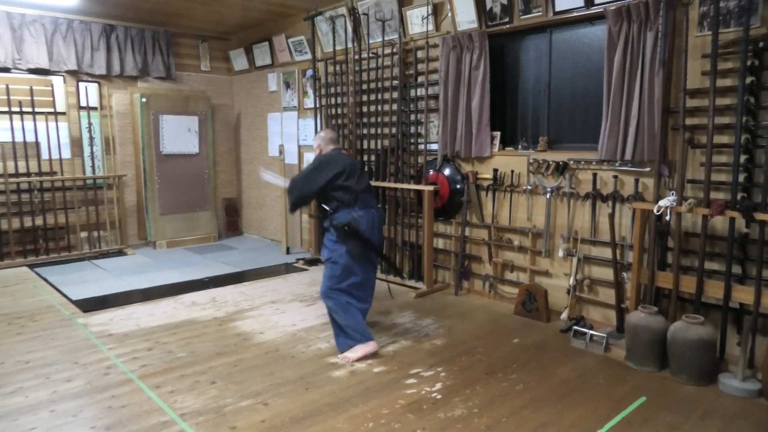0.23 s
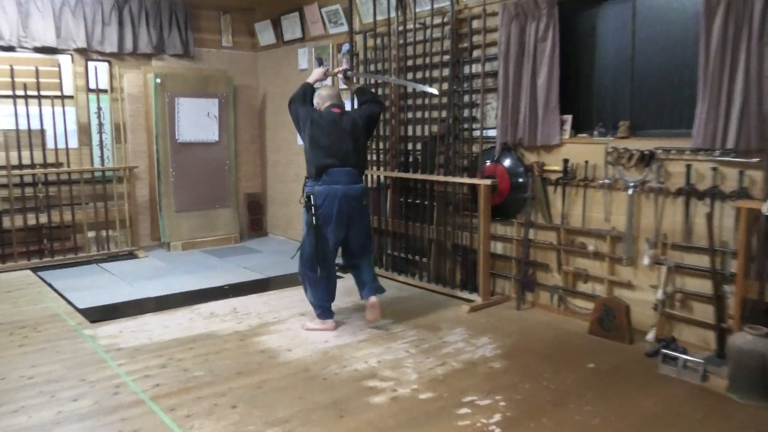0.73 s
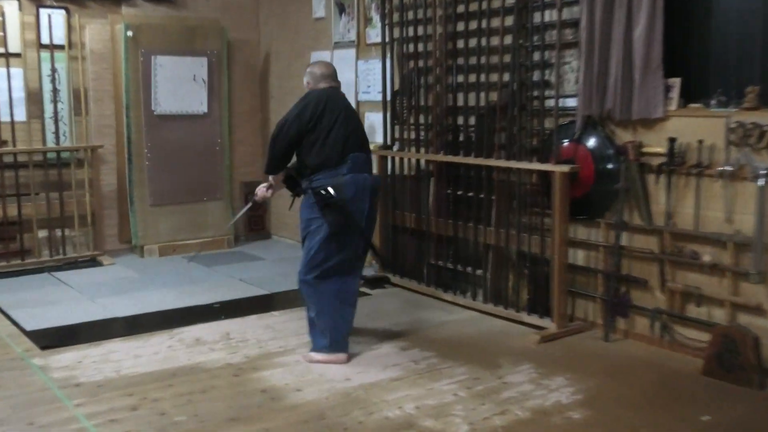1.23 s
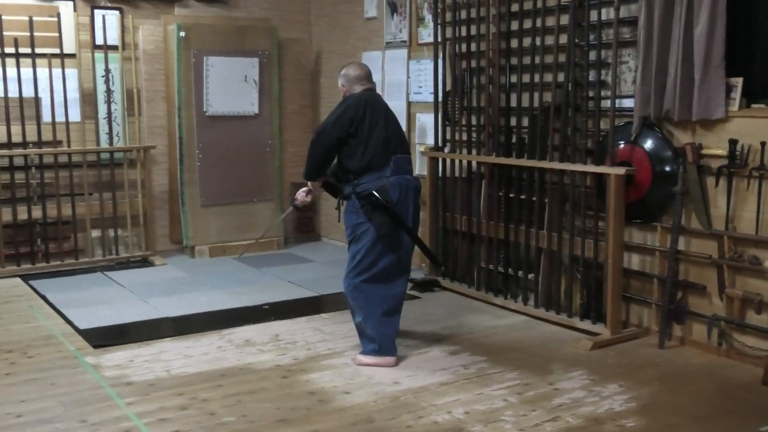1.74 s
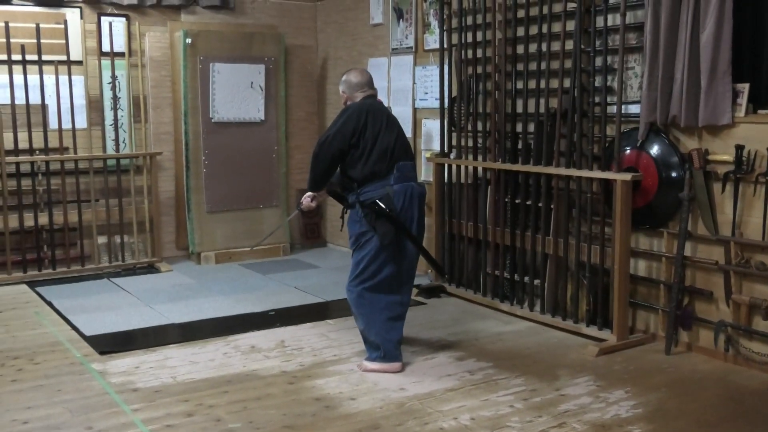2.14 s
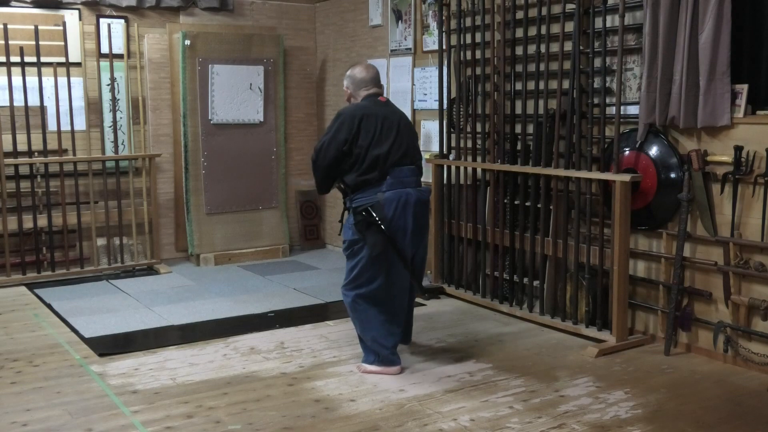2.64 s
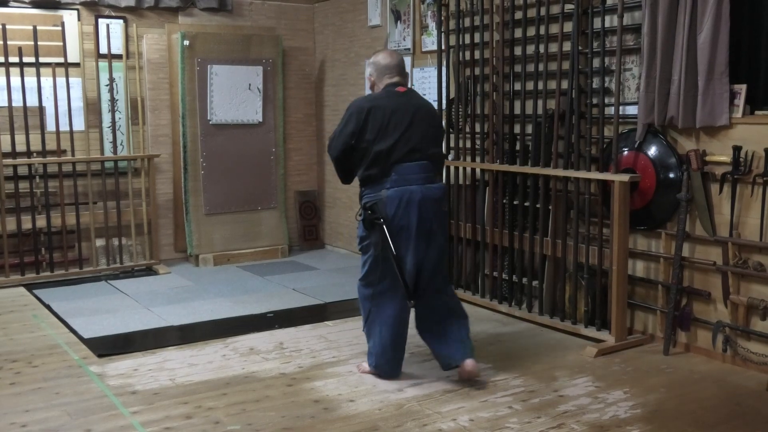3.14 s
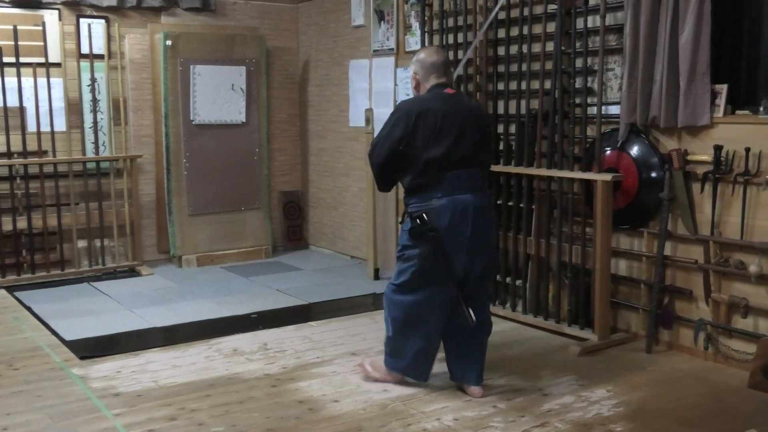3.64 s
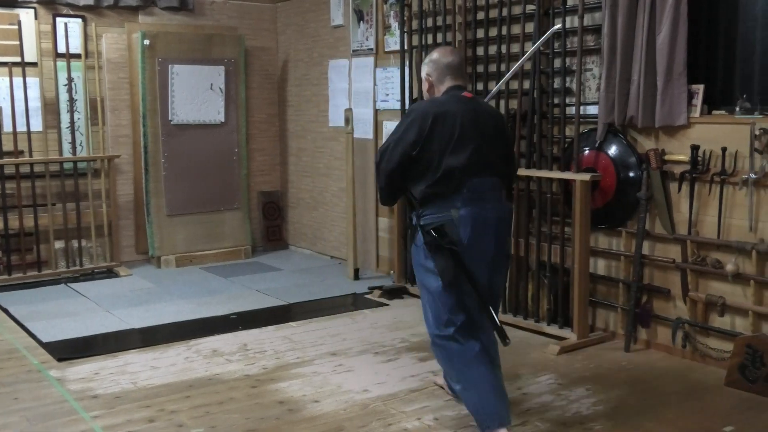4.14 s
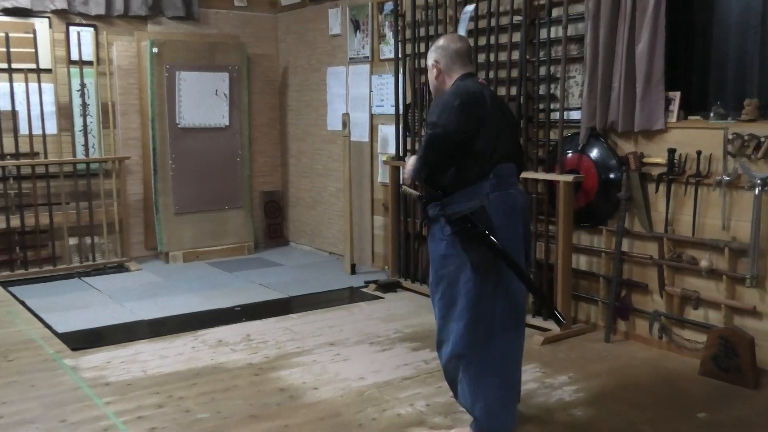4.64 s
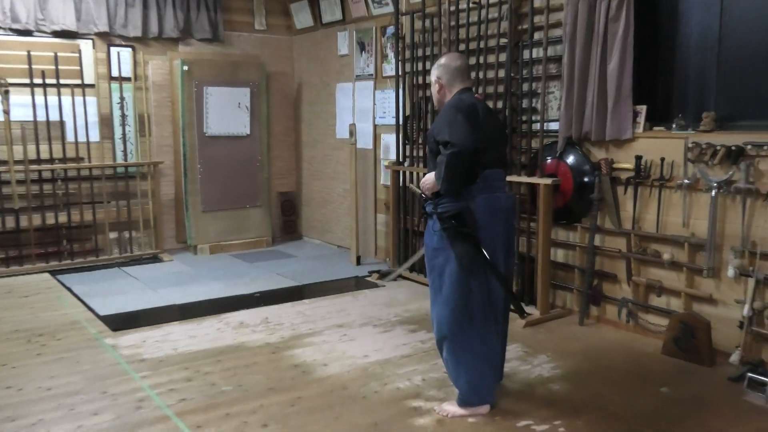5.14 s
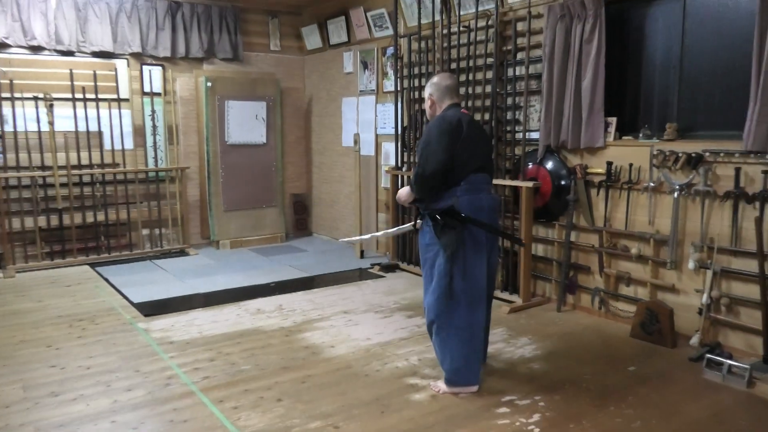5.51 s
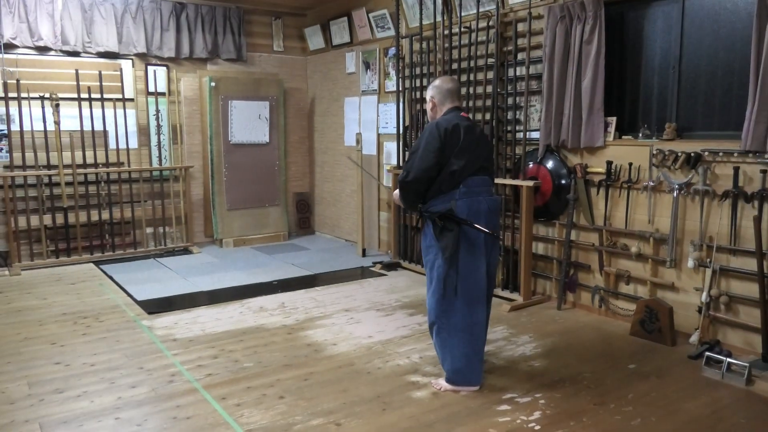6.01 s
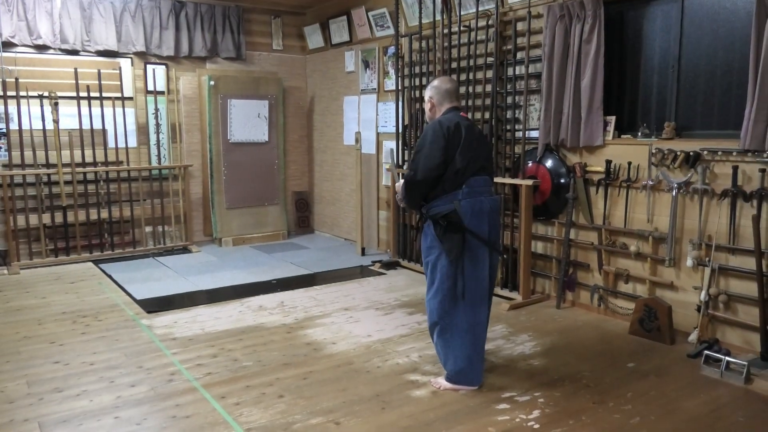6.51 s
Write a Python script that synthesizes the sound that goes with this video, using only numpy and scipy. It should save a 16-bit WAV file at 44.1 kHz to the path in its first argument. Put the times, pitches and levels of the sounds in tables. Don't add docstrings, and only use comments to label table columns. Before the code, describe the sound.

A swordsman's stamp booms through wooden planks with ringing steel, then quieter cloth swishes, sole scuffs and faint blade clinks follow over soft fan hum.

```python
import sys
import numpy as np
from scipy import signal
from scipy.fft import rfft, irfft
from scipy.io import wavfile
from scipy.ndimage import uniform_filter1d

SR = 44100
rng = np.random.default_rng(int(sys.argv[2]) if len(sys.argv) > 2 else 0)


def store_wav(level_fs):
    pcm = np.round(np.clip(np.atleast_2d(level_fs), -1, 1) * 32767)
    wavfile.write(sys.argv[1], SR, pcm.T.astype(np.int16))


def elevation(decibels):
    levels = np.asarray(decibels, float)
    return 10 ** (levels / 20)


N = 298363
LEAD = SR // 5
M = N + LEAD
FREQ = np.maximum(np.fft.rfftfreq(M, 1 / SR), 1)


def level(x, db):
    return x * elevation(db) / np.sqrt(np.mean(x ** 2))


def across(table, hz):
    f, v = np.transpose(table)
    return np.interp(np.log(hz), np.log(f), v)


def band(x, lo_hz, hi_hz):
    sos = signal.butter(2, [lo_hz, min(hi_hz, SR / 2.2)], "band", fs=SR, output="sos")
    return signal.sosfilt(sos, x)


def walk(rate):
    k = int(SR / rate)
    held = np.repeat(rng.standard_normal(M // k + 1), k)
    return uniform_filter1d(uniform_filter1d(held, k), k)[:M]


def ring(push, modes, slim, size):
    t, y = np.arange(size) / SR, 0
    for k, (hz, width, db) in enumerate(modes):
        response = np.sin(2 * np.pi * hz * t) * np.exp(-np.pi * slim * width * t)
        mode = signal.fftconvolve(push, response)[:size]
        y = y + (-1) ** k * np.sqrt(width) * level(mode, db)
    return y / np.abs(y).max()


def add(track, s, sound):
    i = LEAD + int(s * SR)
    track[i:i + len(sound)] += sound[:M - i]


def stroke(rise, hold, fade_db_s):
    t = np.arange(int((rise + hold + .8) * SR)) / SR
    swell = np.minimum(t / rise, 1) ** 0.744
    return (swell * elevation(-fade_db_s * np.maximum(t - rise - hold, 0))) ** 2


def air():
    # f/Hz, level/dB per Hz
    hiss_spectrum = [(15, -55), (31, -16), (50, -20.5), (62, -7), (102, -15), (127, -10), (180, -16),
                     (256, -16.5), (416, -16), (451, -21), (575, -17.5), (840, -21.5), (911, -17.5),
                     (1190, -27.5), (1440, -22.5), (5280, -42.5), (16000, -37.5)]
    hum_hz, hum_width_hz, hum_db = 101.98, 5.02, -55
    hiss = irfft(rfft(rng.standard_normal((2, M))) * elevation(across(hiss_spectrum, FREQ)), M)
    hiss *= elevation(-55.5 + 0.71 * walk(5.4)) / np.std(band(hiss, 91.3, 20000))
    phase = 2 * np.pi * np.cumsum(hum_hz + hum_width_hz * walk(13)) / SR
    return hiss + elevation(hum_db + 2.05 * walk(18)) * np.sin(phase) * np.array([[1], [.3]])


def hall(x, gap_s, build_s):
    # f/Hz, t60/s
    decay_times = [(60, 0.536), (500, 0.906), (2000, 0.885), (4200, 0.676), (6500, 0.618), (10000, 0.436),
                   (16000, 0.293)]
    t, tail = np.arange(SR + SR // 2) / SR, 0
    noise = rfft(rng.standard_normal((2, len(t))))
    octave = np.log2(np.fft.rfftfreq(len(t), 1 / SR) + 1)
    for centre in np.arange(5, 15, .5):
        share = np.clip(1 - 2 * np.abs(octave - centre), 0, 1)
        tail = tail + irfft(noise * share, len(t)) * 1000 ** (-t / across(decay_times, 2 ** centre))
    build = 1 - np.exp(-np.maximum(t - gap_s, 0) / build_s)
    tail = tail * build * (1 + 0.603 * np.exp(-t / 0.0162))
    return signal.fftconvolve(x[None], tail / np.sqrt(np.sum(tail[0] ** 2)), axes=1)[:, :M]


def cloth():
    # f/Hz, level/dB per Hz
    swish_spectrum = [(1500, -11), (3000, -9), (4200, -2.5), (6000, -1), (9600, 1), (13000, -4),
                      (15000, -10), (16000, -11.5)]
    # t/s, rise/s, hold/s, peak level/dB, dull rub above it/dB
    sweeps = [(-.05, 0.0305, 0.106, -48.5, 11), (0.258, 0.014, 0.072, -48, -11),
              (0.398, 0.0145, 0.032, -45, -12), (0.512, 0.0254, 0.081, -47, -1.5),
              (0.651, 0.0452, 0.027, -41, -5.5), (1.057, 0.0336, 0.102, -44.5, 2),
              (1.29, 0.015, 0.009, -47, 5), (2.189, 0.023, 0.91, -66.5, 4.5), (2.552, 0.042, .02, -59, 1.5),
              (2.717, 0.169, 0.0932, -38, -8), (3.17, 0.0254, 0.125, -48.5, -9),
              (3.434, 0.227, 0.025, -47.5, 4.5), (3.609, 0.115, 0.035, -39, -15.5),
              (3.835, 0.0234, 0.0103, -46.5, -6.5), (3.964, 0.0597, 0.107, -44.5, -8.5),
              (4.095, 0.047, 0.0197, -46.5, -1.5), (4.33, 0.1101, 0.1087, -35, -5.5),
              (4.826, 0.025, 0.12, -57, 2), (5.189, 0.109, 0.102, -61.5, 4.5),
              (5.341, 0.0106, 0.21, -56, 0.5), (5.583, .015, .005, -51, -17), (5.65, 0.039, 0.31, -58, 3.5),
              (6.436, 0.029, 0.178, -65, 6), (6.588, 0.08, .1, -61.5, -1)]
    # t/s, rise/s, hold/s, peak level/dB
    scuffs = [(-.05, 0.1075, 0.0186, -32), (0.292, 0.0736, 0.0195, -38.5), (0.455, 0.031, 0.111, -43),
              (0.614, 0.114, 0.069, -37.5), (1.038, 0.032, 0.063, -34), (1.3, 0.016, .005, -65),
              (2.196, 0.054, 0.265, -57.5), (2.539, 0.054, 0.0186, -51), (2.691, 0.031, 0.628, -49.5),
              (3.48, 0.12, 0.0205, -44), (3.784, 0.021, 0.023, -43.5), (3.912, 0.1, 0.099, -49),
              (4.073, 0.085, 0.154, -46.5), (4.396, 0.16, 0.08, -42), (4.845, 0.056, 0.129, -49.5),
              (5.22, 0.069, 0.049, -55), (5.343, 0.0088, 0.187, -49.5), (5.498, 0.04, 0.0196, -43.5),
              (5.565, 0.0204, 0.0048, -41.5), (5.685, 0.0194, .01, -50.5), (6.488, 0.12, 0.24, -61.5),
              (6.708, 0.0177, .05, -48.5)]
    swish_power, rub_power, scuff_power, sheen_power = power = np.zeros((4, M))
    for s, rise, hold, db, rub_db in sweeps:
        add(swish_power, s, stroke(rise, hold, 75) * elevation(2 * db))
        add(sheen_power, s, stroke(rise, hold, 118) * elevation(2 * db))
        add(rub_power, s, stroke(rise, hold, 64.5) * elevation(2 * (db + rub_db)))
    for s, rise, hold, db in scuffs:
        shape = stroke(rise, hold, 45)
        add(rub_power, s, shape * elevation(2 * (db - 11.5)))
        add(scuff_power, s, shape * elevation(2 * db))
    swish_gain, rub_gain, scuff_gain, sheen_gain = np.sqrt(power)
    burst_db = 1.1 * uniform_filter1d(rng.exponential(size=M), size=12) + 0.685 * walk(60)
    grains = rng.standard_normal((2, M)) * elevation(burst_db)
    swish = irfft(rfft(grains) * elevation(across([(1500, -25.5)] + list(swish_spectrum), FREQ)), M)
    rub = band(grains, 1037, 3896) * elevation(1.1 * walk(29.83))
    scuff = band(rng.standard_normal((2, M)), 126, 1056) * elevation(2.0 * walk(24.99))
    swish = level(swish, 0.83)
    sheen = signal.sosfiltfilt(signal.butter(2, 8070, "high", fs=SR, output="sos"), swish)
    fabric = swish_gain * (swish - sheen) + sheen_gain * sheen
    return fabric + rub_gain * level(rub, -3.5) + scuff_gain * level(scuff, -3.36)


def drags():
    # t/s, rise/s, hold/s, peak level/dB, centre f/Hz
    folds = [(2.777, 0.095, 0.05, -44, 2600), (3.731, 0.015, 0.023, -49, 3300),
             (4.421, 0.097, 0.06, -47, 2440), (6.497, 0.072, 0.19, -57.5, 780)]
    span, out = 1.366, np.zeros((2, M))
    for s, rise, hold, db, hz in folds:
        shape = np.sqrt(stroke(rise, hold, 109))
        for side in out:
            hiss = band(rng.standard_normal(len(shape)), hz / span, hz * span)
            add(side, s, shape * level(hiss, db))
    return out


def taps():
    # t/s, peak level/dB, pitch f/Hz, hall share/dB, length/ms
    ticks = [(.172, -29.5, 2600, -20.5, 1.22), (0.188, -28.5, 1690, -26.5, 2.7),
             (1.085, -33.5, 4300, 9, 4.4), (1.312, -14.5, 1879, -28.5, 1.45),
             (2.217, -49, 4030, -7.5, 1.08), (3.481, -34, 2600, 1.5, 0.99), (3.509, -40, 900, -2, 0.8),
             (3.558, -27.5, 2510, -5.5, 0.64), (3.5966, -22.5, 2330, -4.5, 0.59),
             (3.604, -34, 1710, -11, 0.72), (3.619, -33.5, 1190, -2, 0.61), (3.628, -28, 1900, -4.5, 0.71),
             (3.665, -37.5, 1500, -1.5, 0.79), (3.648, -33, 3370, -5, 0.88), (3.569, -32, 650, -2.5, 1.5),
             (3.685, -36.5, 1800, -5.5, .7), (3.757, -40.5, 2800, -4.5, 0.63),
             (3.745, -30.5, 3600, 0, 0.91), (5.351, -34.5, 1780, 1, 0.41), (5.604, -30, 1510, -7, 1.36)]
    # f/Hz, width/Hz, level/dB
    knock_modes = [(1359, 672, -6), (2600, 513, -4.5), (5160, 340, -8.5)]
    # f/Hz, width/Hz, level/dB
    side_modes = [(1138, 136, 12), (2600, 410, -13.5), (4200, 500, -21.5)]
    # f/Hz, width/Hz, level/dB
    rack_mode = (692, 365, -4.5)
    near, far = np.zeros((2, M)), np.zeros(M)
    t_ms = np.arange(400) * 1000 / SR
    for s, db, hz, wet_db, ms in ticks:
        close = wet_db < -10
        side_db, snap_db = (9.5, -8.5) if close else (-14, -25)
        tuning = 1 + (not close) * .07 * rng.standard_normal(len(knock_modes))
        damp, dull_db = (1, 0) if close else (3.1, -1.5)
        knock = [(f * k, w * damp, d + dull_db * np.log2(f / 1000))
                 for (f, w, d), k in zip(knock_modes, tuning)]
        snap = band(rng.standard_normal(400) * np.exp(-t_ms / 1.27), 5150, 12000)
        push = rng.standard_normal(400) * np.exp(-t_ms / ms)
        body = knock[1:] if close else [knock[1], rack_mode]
        tick = elevation(db) * ring(push, [knock[0], (hz, 400, -2)] + body, 0.287, size=1500)
        add(near[0], s, tick)
        add(near[0], s, elevation(db + snap_db) * snap / np.abs(snap).max())
        add(near[1], s, elevation(db + side_db) * ring(push, side_modes, 0.49, size=1500))
        add(far, s, tick * elevation(wet_db))
    return near, far


def blades():
    # t/s, peak level/dB, chatter/s, crack above the ring/dB, crack from f/Hz
    clinks = [(-.03, -33.5, 0.0727, 5.5, 3100), (0.919, -17.5, 0.00392, -4.5, 5800),
              (1.148, -30, 0.0113, 1, 3500), (1.1657, -21, 0.00547, 4, 4400),
              (4.847, -46, 0.00142, 2.5, 8500), (4.96, -29, 0.0123, -6, 3580),
              (5.074, -32.5, 0.00786, -1, 5960), (5.908, -38.5, 0.0155, -1, 2510),
              (.274, -32.5, 0.0142, -6.5, 3800), (0.9147, -22.5, 0.00118, 3.5, 7460),
              (.947, -29, 0.0081, -3.5, 2975), (1.162, -29.5, 0.0058, 3, 4200),
              (1.177, -30, 0.0076, 5.5, 3400), (1.193, -33.5, 0.0094, 8.5, 4530),
              (1.218, -36, 0.0066, -4, 4200), (4.954, -41, 0.0048, 3, 1790), (5.09, -33, 0.0044, 1.5, 6200),
              (5.188, -50, .004, -11, 5800)]
    wall_db = [-0.5, -1.5, 4, 2, 6, -2, -1.5, -0.5, 0.5, -14.5, 2.5, -9.5, 0, -4, 8, -4.5, -10, -5]
    # f/Hz, width/Hz, level/dB
    hilt = [(2700, 126, -6.5), (3522, 51, 2.5), (4300, 49, 2), (5830, 137, 1.5), (6630, 74, -9.5),
            (9060, 110, -13)]
    dart = [(3330, 110, -1), (3830, 120, -2), (4790, 45, -3), (6110, 80, 0), (7010, 49, 0), (7890, 89, -4),
            (8450, 180, -3), (8950, 170, -4), (11400, 46, -8), (11700, 51, -9)]
    blade = [(2710, 240, -18.5), (3416, 42.5, -2), (4300, 54, 1.5), (5020, 310, -8.5), (5967, 131, 3),
             (6607, 76, 3), (6860, 45, 5), (7320, 59, -5.5), (7830, 170, -9), (8350, 120, 0),
             (9140, 117, 1.5), (9620, 52, -5), (10320, 38, -14), (10940, 180, -10)]
    spine = [(2760, 84, -7), (3400, 77, -5.5), (4285, 99, -1), (4693, 117, -6), (5964, 62, -2.5),
             (6393, 127, -4), (6710, 188, -1.5), (7290, 40, -12.5), (7850, 73, -10), (8346, 68, -2.5),
             (9070, 55, 0.5), (10860, 91, -8), (12600, 59, -12.5), (13320, 93, -13)]
    pin = [(5940, 150, -8), (6730, 49, -7), (7910, 34, 0), (8400, 91, -8), (10000, 100, -8),
           (10600, 38, -5), (11200, 140, -10)]
    guard = [(2093, 69, -9), (2614, 44, -0.5), (3430, 67, -5), (3770, 108, -6.5), (4276, 67, 2.5),
             (4857, 63, -5.5), (5840, 84, 0.5), (6750, 62, 1), (7730, 107, -11), (8820, 133, -12),
             (10120, 60, -11), (10830, 69, -13), (11880, 58, -16.5)]
    collar = [(4200, 90, -3.5), (5420, 95, -9), (6050, 58, -5.5), (6350, 55, -2), (6920, 75, -2.5),
              (7800, 107, -23), (7930, 118, -3), (8870, 55, -8.5), (9340, 340, -9), (9940, 150, -14),
              (11530, 89, -12), (12030, 94, -14), (12400, 50, -14)]
    mouth = [(2843, 94, 0.5), (3900, 71, 0.5), (4260, 60, -3), (4570, 86, 3), (5657, 64, 2), (5900, 85, -6),
             (6530, 220, 0.5), (7760, 66, 0.5), (8370, 80, 2), (9730, 96, -9.5), (10270, 100, -16),
             (10600, 130, -4.5), (12400, 70, -15)]
    sheath = [(3640, 400, -1), (4400, 387, 1.82), (5150, 470, -0.47), (6200, 620, -6)]
    parts = [dart, blade, spine, spine, pin, guard, collar, mouth, sheath, pin, hilt,
             spine, spine, spine, spine, guard, collar, collar]
    rings, cracks, clacks, spread = np.zeros((4, M))
    t = np.arange(SR // 6) / SR
    for (s, db, chatter, crack_db, lo_hz), modes, hall_db in zip(clinks, parts, wall_db):
        chance = rng.random((3, len(t)))
        impacts = (chance[0] < 900 / SR) * (2 * chance[1] - 1)
        impacts[0] = 1
        twins = [(hz * (1 + .012 * rng.standard_normal()), w, d - 8) for hz, w, d in modes]
        fade = np.exp(-t / chatter) - 0.768 * np.exp(-t / chatter / 0.467)
        scrape = (impacts + 3.02 * (chance[2] - .5)) * fade
        crack = band(scrape, lo_hz, 8500 + 0.546 * lo_hz)
        clack = band(scrape, 1403, 3550)
        steel = elevation(db) * ring(impacts * fade, list(modes) + twins, 1.9, size=SR // 4)
        add(rings, s, steel)
        add(spread, s, steel * elevation(hall_db))
        add(cracks, s, elevation(db + crack_db) * crack / np.abs(crack).max())
        add(clacks, s, elevation(db) * clack / np.abs(clack).max())
    return rings, cracks, clacks, spread


def planks():
    # t/s, peak level/dB, pitch f/Hz, contact/s, width/Hz
    bends = [(0.059, -32, 264, 0.0185, 12.7), (0.109, -35, 225.5, 0.0137, 16),
             (1.064, -21.5, 178, .01, 16.3), (1.078, -18, 130.1, 0.0108, 13.3),
             (1.115, -25, 254.1, 0.0068, 15.4), (1.216, -27, 142.3, 0.0083, 17),
             (1.21, -24.5, 71.3, 0.0093, 4.9), (1.371, -33, 72.3, 0.0088, 5.64),
             (5.525, -39, 142.7, 0.0206, 8.1), (5.548, -46, 372.7, 0.0068, 22.6),
             (5.584, -38, 131.7, 0.0078, 16), (5.596, -41, 468.8, 0.0056, 18.6),
             (5.622, -41.5, 285.3, 0.0062, 26.6), (5.628, -41, 137.5, 0.0064, 18.5),
             (5.702, -47, 439.8, 0.0066, 25.4), (5.925, -47, 787, 0.0044, 52), (-.02, -32, 100.1, .02, 6.9),
             (.12, -28, 95.97, 0.026, 6.8), (.22, -29.5, 93.13, 0.0255, 6.9),
             (.365, -38, 325.5, 0.0116, 15), (.56, -41, 171.3, 0.018, 10), (0.728, -40, 77.4, 0.024, 9.1),
             (1.11, -22, 73, 0.0168, 4.5), (1.285, -32.5, 123.7, 0.017, 9.7),
             (4.35, -47, 140.8, 0.0135, 11.4)]
    out, t = np.zeros(M), np.arange(SR // 10) / SR
    for s, db, hz, contact, width in bends:
        push = t / contact * np.exp(-2 * t / contact) * np.sin(2 * np.pi * hz * t)
        add(out, s, elevation(db) * ring(push, [(hz, width, 0)], slim=1, size=SR // 2))
    return out


def feet():
    # t/s, peak level/dB, toe slap above it/dB, contact/s, most moved span f/Hz
    steps = [(-.04, -19, -9.5, 0.0744, 99.6), (.04, -21.5, -5.5, 0.0298, 102.3),
             (.17, -28.5, -12, 0.0575, 90.6), (.335, -34, 4.5, 0.022, 205), (.55, -37, -6, 0.052, 163),
             (.70, -30, -6.5, 0.06, 90.5), (1.0595, -15.5, -32.5, 0.0063, 82),
             (1.068, -18.5, -7, 0.0129, 156), (1.115, -21.5, -6, 0.0177, 75),
             (1.2, -25.5, -10.5, 0.0156, 73.6), (1.36, -27.5, -14.5, 0.01555, 85),
             (1.08, -26.5, -2.5, 0.0105, 134), (1.285, -28, -18.5, 0.0119, 122.5),
             (1.439, -41, -13.5, 0.018, 109), (5.593, -50.5, 11, 0.0068, 170),
             (3.808, -53.5, 12.5, 0.0038, 218), (4.14, -57, 13.5, 0.0395, 198),
             (4.35, -38, -19, 0.0476, 79), (4.56, -47, -0.5, 0.0335, 189), (5.421, -46, -3, 0.0316, 130),
             (5.54, -45, -7.5, 0.0215, 150), (5.51, -48, 2.5, 0.039, 140)]
    # f/Hz, width/Hz, level/dB
    floor_modes = [(56.2, 14.5, 5), (61.35, 1.35, 9), (73, 7.13, 4.5), (87.7, 1.15, -10), (93.6, 6.95, -1),
                   (110.4, 4.5, 0.5), (122.8, 6.2, 1), (142.15, 7, -0.5), (163, 17.5, 0.5), (178, 21.3, -2),
                   (204.05, 8, 0.5), (227.8, 16.8, -4.5), (258.6, 13.6, -13.5)]
    # f/Hz, width/Hz, level/dB
    slap_modes = [(296.5, 41.7, -5.5), (326.6, 26, 4.5), (348.2, 10.8, -10), (399, 78.4, 4.5),
                  (472, 18.1, -5.5), (596.3, 22, -5), (683.7, 32.8, -4), (900, 280, -51)]
    out, t = np.zeros(M), np.arange(SR // 5) / SR
    for s, db, slap_db, contact, span_hz in steps:
        push = rng.standard_normal((2, len(t))) * t / contact * np.exp(-2 * t / contact)
        spot = [(hz, w, d - 13 * np.abs(np.log2(hz / span_hz))) for hz, w, d in floor_modes]
        add(out, s, elevation(db) * ring(push[0], spot, 1.0, size=SR))
        add(out, s, elevation(db + slap_db) * ring(push[1], slap_modes, 1.216, size=SR // 2))
    return out


def scene():
    # f/Hz, level/dB
    port_side = [(60, -19), (125, -9), (250, -10.5), (500, -10.5), (1000, -12.5), (2000, -6.5), (4000, -9),
                 (8000, -27), (12000, -11), (16000, -17)]
    # f/Hz, level/dB
    port_balance = [(60, -5), (110, -1), (200, 1), (380, 1), (700, -0.1), (1290, 0.5), (2380, 2), (4400, 0),
                    (8120, -0.58), (15000, 0.5)]
    # f/Hz, phase/rad
    port_lead = [(0, 0), (690, 0.4), (950, -1.328), (1460, 0.967), (1980, -0.13), (5080, -0.763),
                 (6370, -0.092), (14700, -0.77), (15800, -0.1)]
    near, far = taps()
    steps, boards = feet(), planks()
    rings, cracks, clacks, spread = blades()
    sent = elevation(2.0) * band(steps + elevation(-7) * boards, 224.5, 4300)
    sent += elevation(6.0) * spread + elevation(2.5) * cracks + elevation(-4.5) * clacks
    sent += elevation(2.0) * band(far, 426, 2520)
    field = hall(sent, gap_s=0.00086, build_s=0.00149) + cloth() + drags() + near
    field[0] += steps + boards + cracks
    field[0] += elevation(2) * band(rings, 2190, 7300) + elevation(4.5) * band(rings, 6040, 11200)
    field[1] += 0.223 * np.roll(steps + boards, 500)
    rumble_cut = signal.butter(4, 48, "high", fs=SR, output="sos")
    mid, side = rfft(signal.sosfilt(rumble_cut, field) + air())
    side = side * elevation(across(port_side, FREQ))
    tilt = elevation(across(port_balance, FREQ) / 2) * np.exp(.5j * across(port_lead, FREQ))
    return irfft(np.array([mid * tilt + side, mid / tilt - side]), M)[:, LEAD:]


def band_limit(x):
    return signal.sosfilt(signal.butter(12, 15840, fs=SR, output="sos"), x)


def record(dry):
    top_cut = signal.ellip(8, .1, 50, 15800, fs=SR, output="sos")
    mix = signal.sosfiltfilt(top_cut, dry)
    return band_limit(mix)


dry = scene()
out = record(dry)
store_wav(out)
```